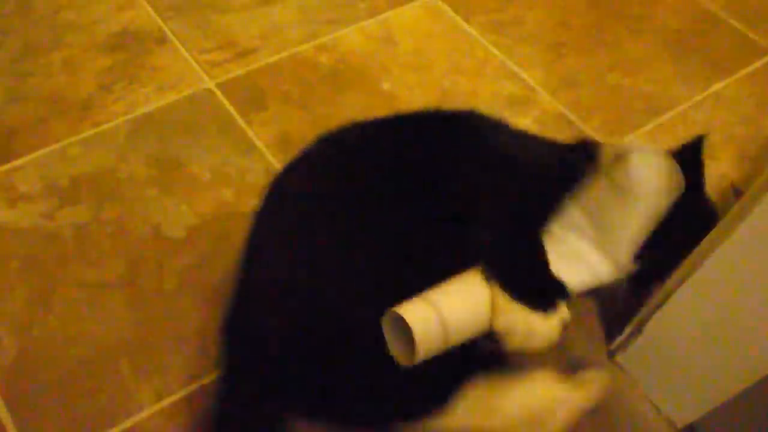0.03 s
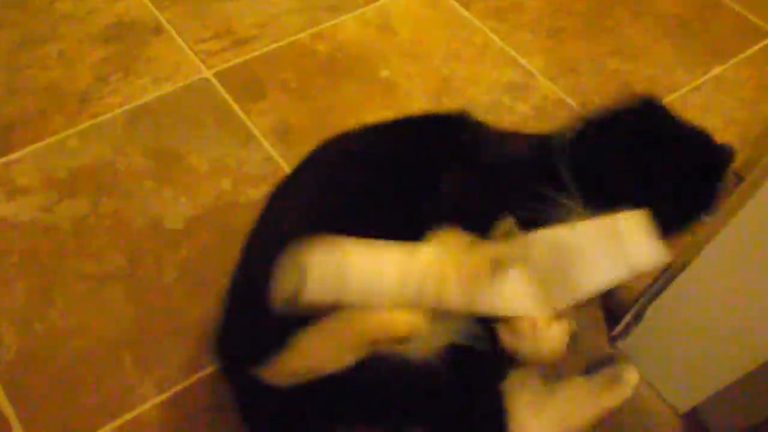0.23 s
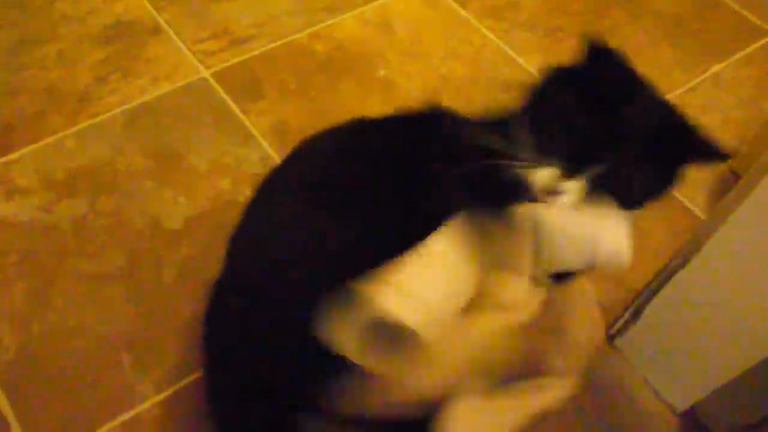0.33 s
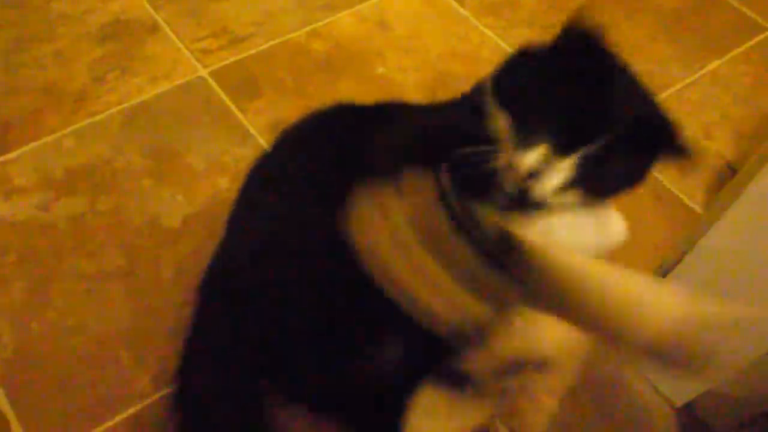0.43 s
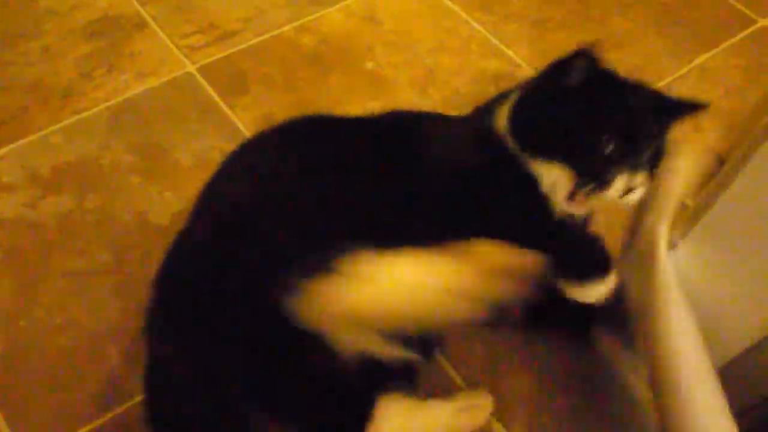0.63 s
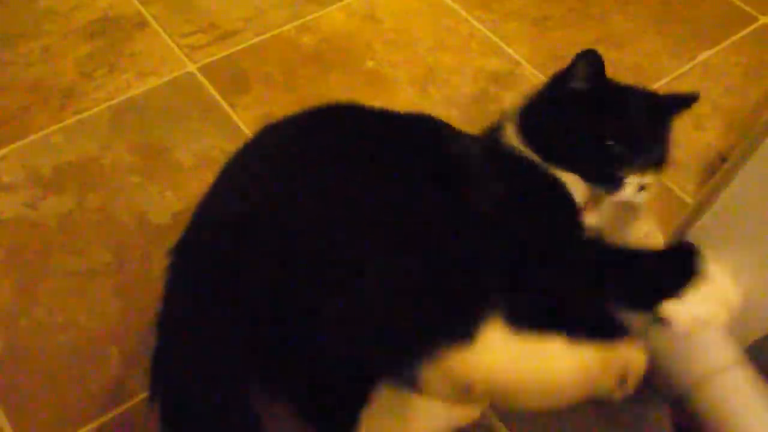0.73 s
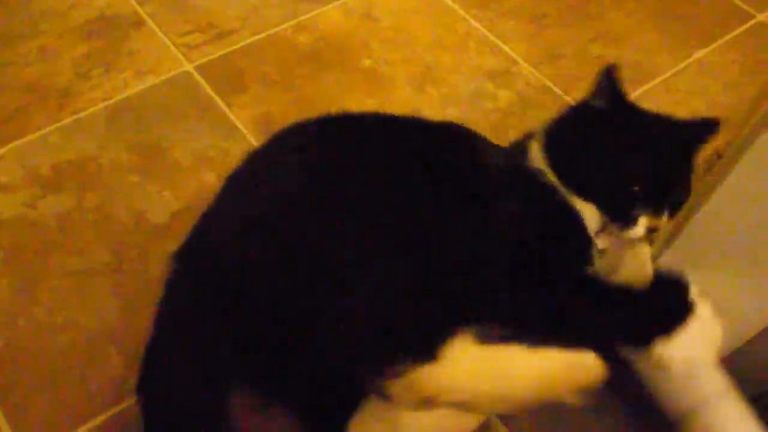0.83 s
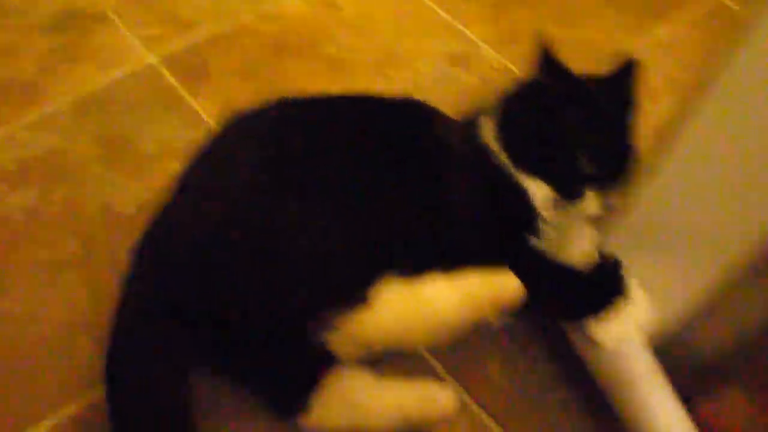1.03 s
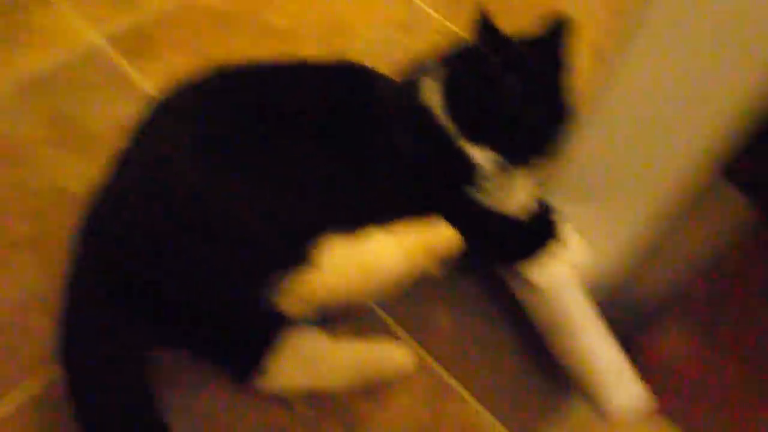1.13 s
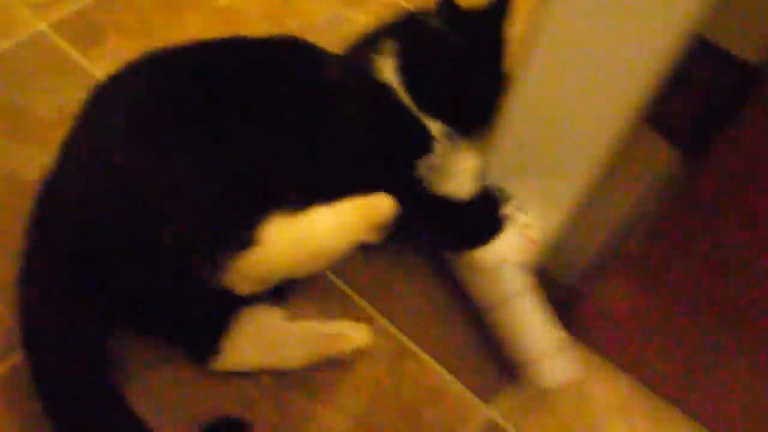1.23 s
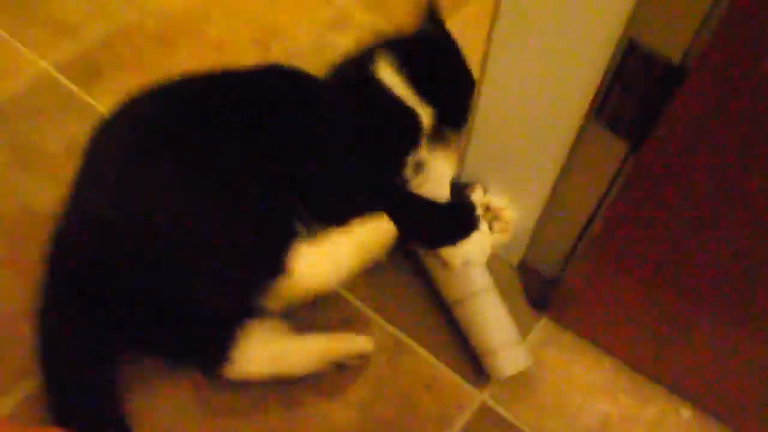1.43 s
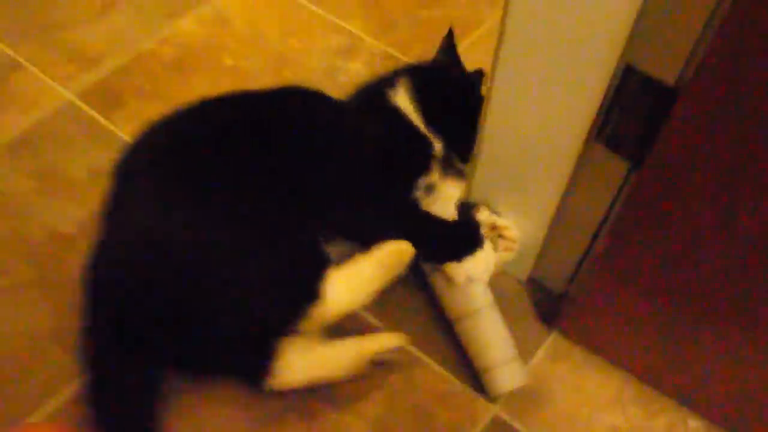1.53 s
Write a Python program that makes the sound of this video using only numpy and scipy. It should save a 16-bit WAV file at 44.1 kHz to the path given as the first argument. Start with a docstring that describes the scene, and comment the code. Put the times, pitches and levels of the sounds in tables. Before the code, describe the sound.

An empty cardboard tube is scuffed by a cat's claws, then knocked hard in a fast clattering burst against tile and door, before sparse softer taps; close small microphone, small hard room, faint hiss.

```python
"""Cat wrestling a cardboard tube

A cat plays with an empty tube on a tile floor beside a door, in a small hard room; a small microphone is near.
Knocks are noise cracks and snaps that set the tube's modes ringing; blows ring door modes and thuds.
Claws and teeth scuff the card: dense friction grains, bright off its surface and hollow through the tube.
Room hiss, a slow rumble and the body's bass shuffle lie beneath; the hardest knocks overload the microphone.
"""
import sys
import numpy as np
from scipy import signal
from scipy.fft import rfft, irfft, next_fast_len
from scipy.io import wavfile

SR = 44100
rng = np.random.default_rng(int(sys.argv[2]) if len(sys.argv) > 2 else 0)


def bounce(signal):
    """Save signal as a 16-bit WAV file at the path given by the first command-line argument."""
    frames = np.transpose(np.atleast_2d(signal))
    limited = np.clip(frames, -1, 1)
    pcm = np.round(limited * 32767).astype(np.int16)
    wavfile.write(sys.argv[1], SR, pcm)


def voltage_ratio(decibels):
    """Convert decibels (scalar or array-like) to amplitude ratios, 20 dB per decade."""
    exponent = np.asarray(decibels, float) / 20
    return 10 ** exponent


N = 70560  # samples, 1.6 s

# modes of the unsqueezed tube: f/Hz, level/dB, t60/s
TUBE_MODES = [(755, -9, 0.021), (827.6, -3, 0.03), (958, -6, 0.017), (1230, -14, 0.023), (1400, -5, 0.013),
              (1694, -15.5, 0.044)]

DULL_HZ = 2600  # soft card passes little treble into the ring; the door gets the same edge
SCUFF_CUT_HZ = 9500  # treble edge of the scuffed surface and of the snaps
LUMP_DB = 2  # spread of the slow level changes in rumble and shuffle


def rms_one(x):
    """Scale to rms 1."""
    return x / np.sqrt(np.mean(x ** 2) + 1e-20)


def at_hz(points, hz):
    """Read a spectrum in dB along a log frequency axis."""
    point_hz, point_db = np.transpose(points)
    return np.interp(np.log(hz), np.log(point_hz), point_db)


def cut(x, hz, kind):
    """Second-order Butterworth edge."""
    return signal.sosfilt(signal.butter(2, min(hz, .45 * SR), kind, fs=SR, output="sos"), x)


def band_noise(order, low_hz, high_hz):
    """Band-limited noise of rms 1; the first second, where the filter settles, is thrown away."""
    band = signal.butter(order, [low_hz, high_hz], "band", fs=SR, output="sos")
    return rms_one(signal.sosfilt(band, rng.standard_normal(N + SR))[SR:])


def drift(rate_hz):
    """Slow random wander of rms 1: noise through two equal one-pole low-passes."""
    r = np.exp(-2 * np.pi * rate_hz / SR)
    return rms_one(signal.lfilter([1], [1, -2 * r, r * r], rng.standard_normal(N + SR))[SR:])


def ring(clicks, hz, t60):
    """A decaying mode: a unit click starts a sine of height 1 that falls 60 dB in t60."""
    r = voltage_ratio(-60 / (t60 * SR))
    w = 2 * np.pi * hz / SR
    return signal.lfilter([0, np.sin(w)], [1, -2 * r * np.cos(w), r * r], clicks + 1e-18)


def strike(s, db, count, spread_db):
    """Blows as clicks, one row per mode; each mode takes each blow with its own chance strength."""
    clicks = np.zeros((count, N))
    levels_db = db[:, None] + spread_db * rng.standard_normal((len(s), count))
    clicks[:, (s * SR).astype(int)] = voltage_ratio(levels_db).T
    return clicks


def background():
    """Room hiss is noise shaped in frequency; the slow rumble is deep band noise of wandering level."""
    # hiss spectrum, before its overall level is set: f/Hz, level/dB
    hiss_spectrum = [(60, 9), (130, -10), (220, 4.5), (420, 4), (600, -2), (850, 0.5), (1500, -0.5),
                     (2130, -8.5), (5300, -8), (9000, -22), (16000, -33)]
    hiss_db, rumble_db = -41.5, -36
    hz = np.maximum(np.arange(N // 2 + 1) * SR / N, 1)
    shaped = rfft(rng.standard_normal(N)) * voltage_ratio(at_hz(hiss_spectrum, hz))
    hiss = voltage_ratio(hiss_db) * rms_one(irfft(shaped, N))
    rumble = band_noise(3, 6, 19.2) * voltage_ratio(rumble_db + LUMP_DB * drift(11))
    return hiss + rumble


def shuffle():
    """The body shifting on the floor: bass noise with a lumpy level."""
    # course of the shuffle, ahead of the lumps: t/s, level/dB
    shuffle_course = [(0, -46.5), (0.949, -39), (1.6, -86)]
    level_db = np.interp(np.arange(N) / SR, *np.transpose(shuffle_course))
    return band_noise(2, 30, 110) * voltage_ratio(level_db + LUMP_DB * drift(33))


def boom():
    """The hardest blow leaves a low boom: two close modes beat, then go on weaker after one beat."""
    # the boom: t/s, level/dB, f/Hz, beat rate/Hz, t60/s
    boom_mode = (.712, -19, 82, 5, 1.2)
    start, db, hz, beat_hz, t60 = boom_mode
    t = np.clip(np.arange(N) / SR - start, 0, None)
    beat = np.sin(np.pi * beat_hz * t) * np.where(t * beat_hz < 1, 1, .3)
    return voltage_ratio(db - 60 * t / t60) * beat * np.sin(2 * np.pi * hz * t)


def struck_modes(s, db, modes):
    """A struck body: the sum of its decaying modes, with a small chance spread in each blow."""
    clicks = strike(s, db, len(modes), 1.5)
    return sum(voltage_ratio(mode_db) * ring(row, hz, t60) for row, (hz, mode_db, t60) in zip(clicks, modes))


def door():
    """Heavy blows on door and tile thud and ring the panel; kicks low down sound its deep mode."""
    # heavy blows: t/s, door panel level/dB, dull thud level/dB
    heavy_blows = [(.438, -23, -16.5), (.472, -20.5, -16.5), (.497, -47, -8.5), (0.524, -18.5, -7.5),
                   (0.642, -21.5, -21), (0.7149, -11.5, -30), (.761, -10, -44), (1.081, -41, -47),
                   (1.113, -33.5, -38), (1.173, -34.5, -23), (1.236, -27, -18), (1.43, -37, -27),
                   (1.455, -32.5, -18.5)]
    # modes of the door panel: f/Hz, level/dB, t60/s
    panel_modes = [(286.2, -14.5, 0.34), (385, -1, 0.08), (428.7, -0.5, 0.13)]
    # modes of the thud: f/Hz, level/dB, t60/s
    thud_modes = [(309, -5.5, 0.052), (630, 4, 0.013)]
    # kicks low on the door, with 1 dB of chance spread to come: t/s, level/dB
    low_kicks = [(.083, -28), (0.311, -37), (.47, -20), (0.598, -26.5), (0.713, -14)]
    deep_hz, deep_t60_s = 200.6, 0.26

    s, panel_db, thud_db = np.transpose(heavy_blows)
    panel = struck_modes(s, panel_db, panel_modes)
    thud = struck_modes(s, thud_db, thud_modes)
    kick_s, kick_db = np.transpose(low_kicks)
    deep = ring(strike(kick_s, kick_db, 1, 1)[0], deep_hz, deep_t60_s)
    return cut(cut(panel + thud + deep, 158, "high"), DULL_HZ, "low")


def tube(force):
    """The hollow tube's modes, each driven by its row of force; they ring higher once squeezed."""
    # the tube gripped and squeezed: from t/s, pitch ratio
    squeeze_change = (1.1, 1.15)
    squeeze_s, pitch_ratio = squeeze_change
    late = np.arange(N) >= squeeze_s * SR
    out = 0
    for row, (hz, db, t60) in zip(force, TUBE_MODES):
        mode = ring(row * ~late, hz, t60) + ring(row * late, hz * pitch_ratio, t60)
        out = out + (-1) ** (hz > 900) * voltage_ratio(db) * mode  # upper modes sound in opposite phase
    return cut(cut(out, 290, "high"), DULL_HZ, "low")


def stroke(s, length):
    """Pressure of one scuff: a smooth rise, a hold and a quick exponential fall."""
    rise_share, fall_s = 0.31, 0.0061  # rise as a share of the length; fall time constant
    t = np.arange(N) / SR
    rise = np.clip((t - s) / (rise_share * length), 0, 1)
    return rise * rise * (3 - 2 * rise) * np.exp(-np.maximum(t - s - length, 0) / fall_s)


def scuffs():
    """Friction grains ring short off the card, hollow in the tube, or at one pitch where claws catch."""
    # scuffs of claws and card: start t/s, length/s, surface level/dB, tube ring level/dB
    scuff_list = [(-.01, 0.047, -32, -30.5), (0.043, 0.025, -30, -30.5), (0.067, 0.057, -35.5, -55),
                  (0.113, 0.062, -29.5, -36.5), (0.183, 0.058, -23.5, -68), (.217, 0.011, -16.5, -21.5),
                  (0.244, 0.032, -32.5, -61), (0.276, 0.034, -28, -38), (0.322, 0.012, -25, -69),
                  (0.345, 0.025, -32.5, -34.5), (0.444, 0.012, -17, -13), (0.461, 0.04, -17.5, -14.5),
                  (0.508, 0.0575, -24, -20), (0.621, 0.0074, -28, -20), (0.647, 0.016, -20.5, -15.5),
                  (0.692, 0.011, -20.5, -12), (0.766, 0.065, -32, -62), (0.968, 0.022, -40.5, -47),
                  (1.184, 0.017, -21, -23), (1.205, 0.024, -27, -28), (1.3, 0.067, -41.5, -49),
                  (1.41, 0.063, -41.5, -44.5), (1.461, 0.065, -42.5, -49)]
    # surface colour ahead of its treble cut: f/Hz, relative level per Hz/dB
    surface_spectrum = [(1200, 1), (2100, -13.5), (2700, -1), (4000, -3.5), (6000, 1), (8000, -10),
                        (11000, -10.5), (15500, -23)]
    # claws that catch and rub at one pitch: start t/s, length/s, level/dB, f/Hz
    rub_list = [(0.056, 0.0086, -28, 2750), (0.439, 0.013, -17.5, 3520), (1.482, 0.05, -39, 5520)]
    grains_per_s, grain_spread_db = 8500, 1.5
    grain_cycles, rub_cycles = 15.9, 8.9  # t60 of each resonator, in cycles of its pitch
    clump_db = 3.5  # spread of the clumps under full pressure

    sizes = voltage_ratio(grain_spread_db * np.minimum(rng.exponential(1, N), 5)) * rng.choice([-1, 1], N)
    grains = sizes * (rng.random(N) < grains_per_s / SR)

    # each grain is dealt one of 24 pitches
    dealt = rng.integers(0, 24, N)
    surface = 0
    for k, hz in enumerate(np.geomspace(1300, 15500, 24)):
        grain_ring = ring(grains * (dealt == k), hz, grain_cycles / hz)
        surface = surface + voltage_ratio(at_hz(surface_spectrum, hz)) * hz * grain_ring
    surface = rms_one(cut(cut(surface, SCUFF_CUT_HZ, "low"), SCUFF_CUT_HZ, "low"))

    bright, hollow = 0, 0
    for s, length, db, tube_db in scuff_list:
        shape = stroke(s, length)
        bright = bright + voltage_ratio(db) * shape
        hollow = hollow + voltage_ratio(tube_db) * shape

    rubs = 0
    for s, length, db, hz in rub_list:
        once = ring(grains, hz, rub_cycles / hz)
        pitched = rms_one(ring(once, hz, rub_cycles / hz))
        rubs = rubs + voltage_ratio(db) * stroke(s, length) * pitched

    count = len(TUBE_MODES)
    inside = tube([grains * hollow] * count) / np.std(tube([grains] * count))
    crunch = voltage_ratio(clump_db * np.minimum(10 * bright, 1) * drift(150))  # clumps grow with pressure
    return crunch * bright * surface + inside + rubs


def knocks():
    """Card hits a hard surface: a sharp snap and a short noisy crack, then the tube rings."""
    # knocks: t/s, crack peak level/dB, tube ring level/dB, crack f/Hz, snap peak level/dB
    knock_list = [(.220, -33, -12.5, 3500, -27), (0.4376, 5.5, -3, 4080, -2), (.456, -26, -11.5, 7900, -36),
                  (.471, 2.5, 2.5, 4400, -24), (0.481, 5, -36, 3630, -30), (0.495, -2.5, -9, 3640, -34),
                  (.514, -1.5, -5, 4100, -28), (0.5237, 2, -32, 3020, -54), (.6098, -15, -26, 1500, -55),
                  (0.6209, -5.5, -13, 4100, -36), (.6448, 4, -10, 2030, -16), (.656, -3, -15, 3200, -47),
                  (.665, -10.5, -25, 4900, -16), (0.691, 1, -18, 3860, -44), (0.6905, -7, -10, 4400, -2.5),
                  (.698, -32, -6, 5076, -38), (0.7128, 1.5, -10.5, 4810, -19),
                  (0.7606, -0.5, -6, 3710, -28), (1.1717, -18, -24, 3500, -52),
                  (1.1881, -16.5, -23, 6000, -37), (1.2104, -34, -12, 3500, -46),
                  (1.234, -30, -13, 2600, -40), (1.431, -24, -34, 3000, -54),
                  (1.455, -18.5, -26, 1070, -44)]
    crack_t60_s, snap_t60_s = .009, .0025
    half_band = 2 ** (1.3 / 2)  # the crack's edges lie 1.3 octaves apart

    s, _, tube_db, _, _ = np.transpose(knock_list)
    out = tube(strike(s, tube_db, len(TUBE_MODES), 3))  # 3 dB of chance spread per mode
    t = np.arange(1000) / SR
    for start, crack_db, _, hz, snap_db in knock_list:
        noise = rng.standard_normal(1000)
        crack = cut(noise * voltage_ratio(-60 * t / crack_t60_s), hz / half_band, "high")
        crack = cut(cut(crack, hz * half_band, "low"), hz * half_band, "low")
        snap = cut(np.sign(noise) * voltage_ratio(-60 * t / snap_t60_s), 1000, "high")
        snap = cut(snap, SCUFF_CUT_HZ, "low")
        i = int(start * SR)
        out[i:i + 1000] += voltage_ratio(crack_db) * crack / np.abs(crack).max()
        out[i:i + 1000] += voltage_ratio(snap_db) * snap / np.abs(snap).max()
    return out


def room(x):
    """Small hard room: twelve feedback delays, duller on every round, smeared by three near-allpasses."""
    t60_s, wall_cut_hz = .36, 13000
    size = next_fast_len(N + SR)
    z = np.exp(-2j * np.pi * np.arange(size // 2 + 1) / size)  # delay of one sample
    dull = np.exp(-2 * np.pi * wall_cut_hz / SR)
    wall = (1 - dull) / (1 - dull * z)
    response = 0
    for k, lag in enumerate((np.geomspace(.011, .037, 12) * SR).astype(int)):
        loop = voltage_ratio(-60 * lag / SR / t60_s) * wall * z ** lag
        response = response + (-1) ** k * loop / (1 - loop)
    for lag in (59, 131, 233):
        response = response * (z ** lag - .6) / (1 - 0.57 * z ** lag)
    return irfft(rfft(x, size) * response, size)[:N]


def scene():
    """The cat's play, heard direct and off the walls, over boom, shuffle and background."""
    room_db = -17.5
    play = knocks() + scuffs() + door()
    wet = room(cut(cut(play, 251, "high"), 9000, "low"))
    return (play + voltage_ratio(room_db) * wet + boom() + shuffle() + background())[None]


def low_pass(x):
    """Removes everything above the highest recorded frequency."""
    return signal.sosfilt(signal.butter(12, 16550, fs=SR, output="sos"), x)


def record(dry):
    """The small microphone overloads smoothly towards a ceiling, then the top treble is cut steeply."""
    ceiling = 0.91  # of full scale
    squashed = ceiling * dry / (1 + np.abs(dry / ceiling) ** 4) ** .25
    treble_cut = signal.cheby2(12, 60, 16400, fs=SR, output="sos")  # 60 dB down from 16400 Hz up
    mix = signal.sosfilt(treble_cut, squashed)
    return low_pass(mix)


dry = scene()
out = record(dry)
bounce(out)
```